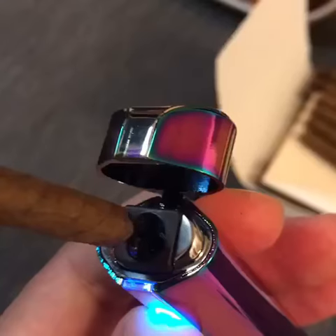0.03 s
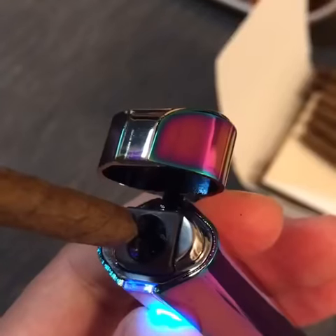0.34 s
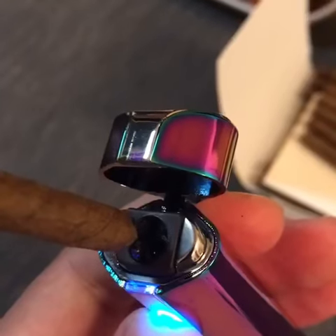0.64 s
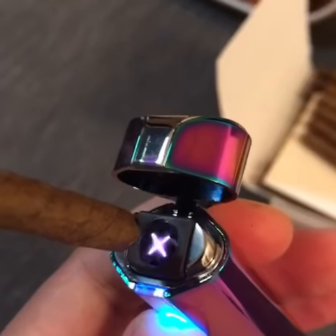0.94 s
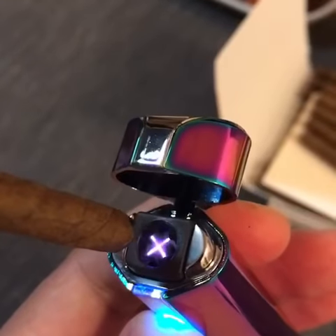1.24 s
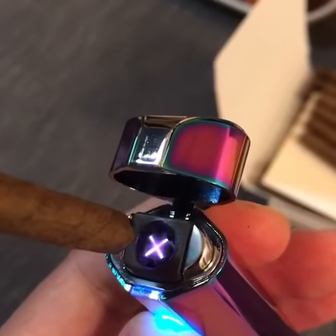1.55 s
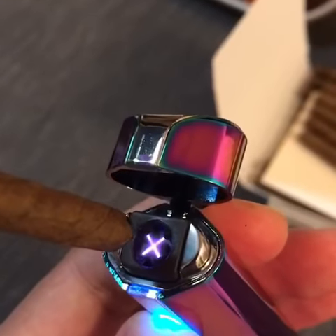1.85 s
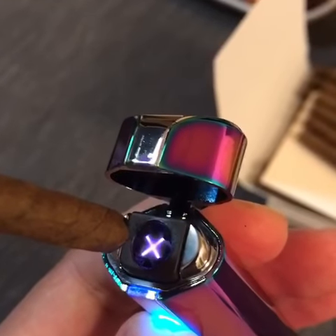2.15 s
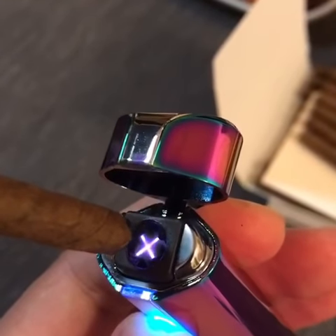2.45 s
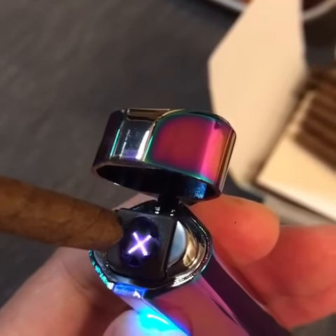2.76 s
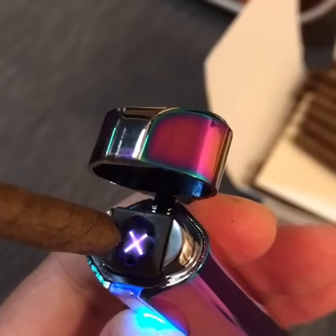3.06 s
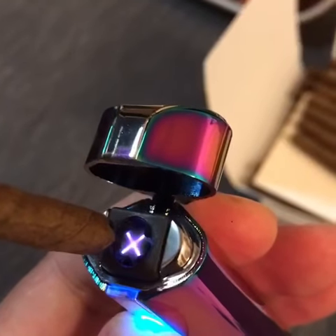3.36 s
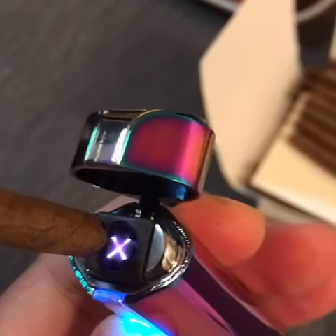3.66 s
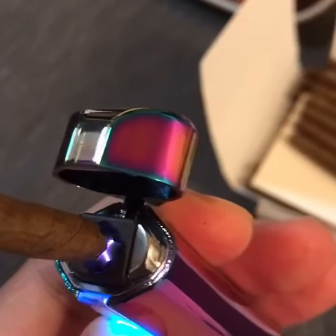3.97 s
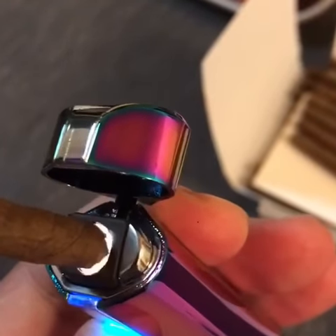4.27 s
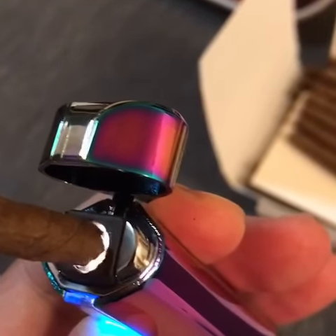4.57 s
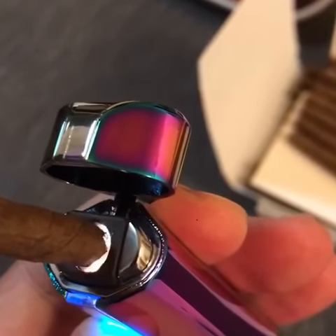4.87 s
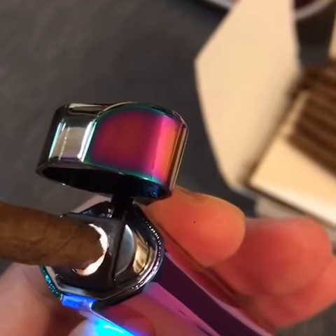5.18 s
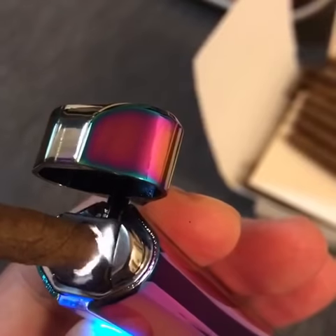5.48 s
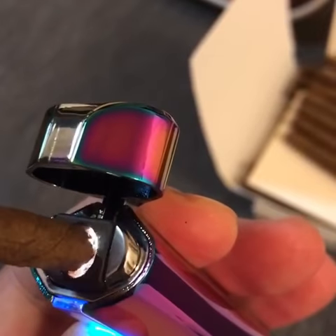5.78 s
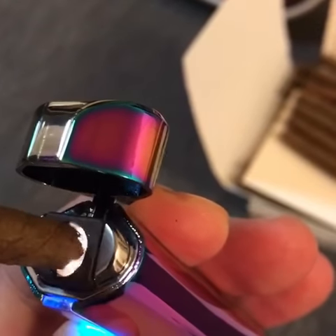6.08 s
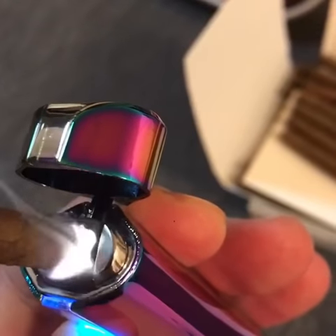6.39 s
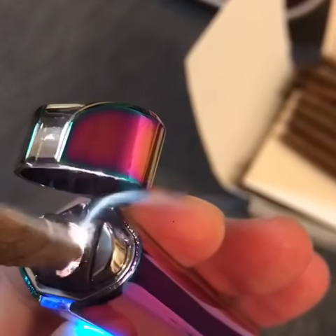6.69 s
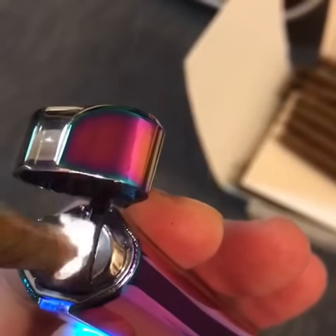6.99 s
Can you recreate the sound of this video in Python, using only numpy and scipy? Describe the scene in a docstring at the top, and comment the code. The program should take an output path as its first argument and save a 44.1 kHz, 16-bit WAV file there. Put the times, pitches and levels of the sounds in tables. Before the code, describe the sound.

In a quiet room, a lighter's button ticks faintly and a spark jumps with one sharp snap. The electric arc holds a thin, high, flickering hiss with a soft flutter of air. A cigar tip is pushed in, and the hiss turns into an uneven sizzle with bright spits and crackles. A dull knock on the case comes at the end. Everything is heard close up.

```python
"""An electric arc lighter burns close by in a quiet room. Its button ticks, a spark jumps the gap with
one sharp snap, and the arc hisses with countless tiny sparks. A cigar tip is pushed in: the arc chokes,
then sizzles and spits on the leaf. The metal well (the hollow round the electrodes) rings with the
sparks and colours their sound. At the end a finger knocks the case."""
import sys
import numpy as np
from scipy import signal
from scipy.fft import rfft, irfft, next_fast_len
from scipy.io import wavfile
from scipy.ndimage import uniform_filter1d, map_coordinates

SR = 44100
rng = np.random.default_rng(int(sys.argv[2]) if len(sys.argv) > 2 else 0)


def output_pcm(signal):
    """Save a mono or channel-first signal as 16-bit PCM at the path in sys.argv[1].

    Samples are clipped to [-1, 1] before scaling.
    """
    pcm = np.clip(np.atleast_2d(signal).T, -1, 1) * 32767
    wavfile.write(sys.argv[1], SR, np.round(pcm).astype(np.int16))


N = 314874
STRIKE_S, TOUCH_S = .9984, 4.27  # the arc lights; the cigar touches it

# The pitches at which the metal well and lid ring. Each row: pitch in Hz, width in Hz, boost in dB.
WELL_RESONANCES = [(2765, 130, 5.5), (3687, 570, 9), (4507, 204, 7), (5620, 840, 6.5), (6820, 620, 4),
                   (8560, 500, 1), (10000, 210, 2), (11040, 520, 1), (12400, 900, 6)]
# The tone of sparks on the leaf. Each row: frequency in Hz, relative level in dB.
SIZZLE_SPECTRUM = [(200, -21), (900, -24.5), (2000, -14.5), (3100, -16), (5000, -11), (6200, -16),
                   (7700, -6.5), (9400, 1.5), (11000, 5), (11700, 0.5), (13000, 1), (13400, -5),
                   (14000, -8.5)]
# The leaf spits bursts of sparks. Each row: start in seconds, relative level in dB, length in seconds.
SPIT_BURSTS = [(4.255, -35, 0.029), (4.343, -39, .003), (4.386, -36, .007), (4.4425, -26.5, 0.016),
               (4.466, -29, 0.0016), (4.5, -29, 0.006), (4.5453, -28, .004), (4.566, -27, .012),
               (4.635, -27.5, 0.012), (4.7, -31, 0.0062), (4.7275, -23.5, 0.004), (4.7593, -30, .004),
               (4.778, -26, 0.021), (4.843, -22.5, 0.0081), (4.861, -24, 0.0065), (4.899, -22.5, 0.0056),
               (4.9342, -23.5, 0.0041), (4.949, -23.5, 0.007), (4.966, -24, 0.015), (4.984, -21.5, .009),
               (5.0035, -22.5, 0.0018), (5.008, -26, 0.0039), (5.039, -20, .007), (5.0516, -18.5, 0.0056),
               (5.068, -22.5, .021), (5.088, -24, .003), (5.105, -28, .002), (5.1344, -19, 0.0039),
               (5.161, -28, .012), (5.205, -19.5, 0.0045), (5.226, -25, .009), (5.244, -25.5, 0.016),
               (5.505, -27, .006), (5.652, -26, 0.005), (5.686, -26, 0.0042), (5.705, -22.5, 0.006),
               (5.752, -24, .003), (5.772, -24, .006), (6.073, -26, 0.0054), (6.0928, -24, .007),
               (6.1172, -22, 0.013), (6.378, -31, .007), (6.458, -28, 0.01), (6.5188, -32, .003),
               (6.5412, -25.5, 0.0079), (6.59, -22.5, 0.009), (6.609, -24, 0.0089), (6.636, -23, 0.0043),
               (6.689, -30, 0.009), (6.7193, -25.5, 0.0088), (6.908, -31, .005), (6.952, -28, .007)]


def amp(db):
    """Turn decibels into a number to multiply by."""
    return 10 ** (np.asarray(db) / 20)


def unit(x):
    """Scale x to an average (rms) level of 1."""
    return x / np.sqrt(np.mean(x ** 2) + 1e-20)


def clock():
    """The time of each sample in seconds."""
    return np.arange(N) / SR


def curve(rows):
    """Join (seconds, value) points with straight lines."""
    return np.interp(clock(), *np.transpose(rows))


def after(s, rise):
    """Climb from 0 to 1 over rise seconds, starting at time s."""
    return np.clip((clock() - s) / rise, 0, 1)


def hump(s, length):
    """A smooth rise to 1 and fall, centred on time s."""
    return np.cos(np.pi * np.clip((clock() - s) / length, -.5, .5)) ** 2


def wobble(rate):
    """A smooth curve through rate random points a second."""
    return map_coordinates(rng.standard_normal(int(N * rate / SR) + 4), [clock() * rate])


def filtered(x, response):
    """Multiply each frequency in x by response(hz)."""
    size = next_fast_len(N + SR // 2)
    return irfft(rfft(x, size) * response(np.fft.rfftfreq(size, 1 / SR)), size)[:N]


def coloured(x, spectrum, resonances=(), size=8192):
    """Give x a tone: a smooth spectrum with ringing peaks on top, in a filter of energy 1."""
    hz = np.fft.rfftfreq(size, 1 / SR)
    points_hz, points_db = np.transpose(spectrum)
    db = np.interp(np.log(hz + 1), np.log(points_hz), points_db)
    db = db + sum(boost / (1 + (2 * (hz - centre) / width) ** 2) for centre, width, boost in resonances)
    # build the filter so that it rings only after each hit, never before
    cepstrum = irfft(np.log(amp(db)))
    ring = irfft(np.exp(rfft(2 * cepstrum[:size // 2], size)))
    return signal.fftconvolve(x, ring / np.linalg.norm(ring))[:N]


def swell(x, treble_db, body_db, split_hz):
    """The treble of a sound and the body below it each follow their own level."""
    body = filtered(x, lambda hz: 1 / (1 + (hz / split_hz) ** 8))
    return amp(body_db) * unit(body) + amp(treble_db) * unit(x - body)


def patchy(x, depth_db):
    """The tone of a sound shifts at random from moment to moment."""
    spectra = signal.stft(x, nperseg=512)[2]
    patches = uniform_filter1d(rng.standard_normal(spectra.shape), size=4, axis=0)  # smooth over pitch
    patches = uniform_filter1d(patches, size=12, axis=1)  # and over time
    return signal.istft(spectra * amp(depth_db * unit(patches)), nperseg=512)[1][:N]


def echoed(x, delay_ms, drift_ms, share):
    """Sound bounces off something near; as the hand drifts, the delay changes and the tone shifts."""
    delay = (delay_ms + drift_ms * wobble(2.5)) * SR / 1000
    return x + share * map_coordinates(x, [np.arange(N) - delay])


def clicks(rows):
    """A one-sample click for each (seconds, dB)."""
    x = np.zeros(N)
    for s, db in rows:
        x[round(s * SR)] = amp(db)
    return x


def rattled(hits, rattle_db, t60):
    """The metal shell rattles after each hit, fading by 60 dB in t60 seconds."""
    t = np.arange(SR // 20) / SR
    tail = rng.standard_normal(len(t)) * amp(-60 * t / t60)
    return hits + amp(rattle_db) * signal.fftconvolve(hits, tail / np.linalg.norm(tail))[:N]


def sparks(rate, spread_db):
    """Tiny sparks of random size at random moments, about rate a second."""
    fired = rng.random(N) < rate / SR
    size = amp(spread_db * np.clip(rng.standard_normal(N), -2, 2))
    return unit(fired * size * rng.choice([-1, 1], N))


def room():
    """Low air noise, with a few room resonances and a faint high whistle."""
    # The background noise dips after the snap, then slowly comes partway back.
    # Each row: time in seconds, level in dB.
    noise_levels = [(.9, -52), (1.1, -56.5), (3.0, -56.5), (4.6, -55), (7.1, -55)]
    # The deep tone of the room. Each row: frequency in Hz, relative level in dB.
    air_spectrum = [(20, -37), (35, -15), (55, 3), (80, -7), (112, -0.5), (145, -7), (185, 0.5), (275, 1),
                    (350, -8.5), (480, -14.5), (1000, -14), (2000, -22), (5000, -35.5), (14000, -47)]
    # Each row: pitch in Hz, width in Hz, boost in dB.
    resonances = [(59, 4.5, 1.0), (107, 13, 3.1), (220, 20, 1.3), (1250, 210, 1.2), (8540, 550, 14.5)]
    air = coloured(rng.standard_normal(N), air_spectrum, resonances)
    return amp(curve(noise_levels)) * unit(air)


def handling():
    """The button ticks under the thumb; later a finger knocks the case."""
    # Hits on the button and on the case. Each row: start in seconds, level in dB.
    button_hits = [(.9587, -36), (.9752, -43)]
    case_hits = [(7.087, -25), (7.0942, -23.5)]
    # The bright button and the dull case. Each row: frequency in Hz, relative level in dB.
    button_spectrum = [(1000, -13), (4000, 0), (5500, -2), (8500, 0), (14000, -12)]
    case_spectrum = [(60, -1), (200, -2), (500, -8), (1400, -10), (2500, -28), (8000, -47)]
    ticks = coloured(rattled(clicks(button_hits), rattle_db=5.5, t60=0.016), button_spectrum)
    return ticks + coloured(clicks(case_hits), case_spectrum)


def flutter():
    """The hot arc wavers and puffs the air: a soft rustle that swells with each sway."""
    # The arc sways. Each row: time of the peak in seconds, boost in dB.
    sways = [(1.79, 6), (2.08, 10), (2.38, 9), (3.05, 10.5), (4.55, 3.5)]
    # The mellow tone of the puffs. Each row: frequency in Hz, relative level in dB.
    puff_spectrum = [(100, -21.5), (300, 2), (500, -0.5), (1000, 1), (1600, -4), (2200, -7), (3200, -7),
                     (6000, -45)]
    level_db = -68 + 4.5 * after(2.76, rise=0.52)  # louder as the cigar comes near
    level_db = level_db + sum(db * hump(s, length=0.28) for s, db in sways)
    puffs = coloured(sparks(rate=5000, spread_db=5.5), puff_spectrum)
    gain = after(STRIKE_S, rise=.008) * amp(level_db + wobble(7))
    return gain * unit(echoed(puffs, delay_ms=3.093, drift_ms=0.27, share=0.39))


def spits():
    """Pockets of moisture burst: each starts at once, sputters brightly for a moment and breaks off."""
    bursts = np.zeros(N + SR)
    t = np.arange(SR // 8) / SR
    for s, db, length in SPIT_BURSTS:
        bursts[round(s * SR):][:len(t)] += amp(db) * np.exp(-(t / length) ** 4)
    sputter = unit(sparks(rate=14000, spread_db=0.5) * amp(2.0 * wobble(1200)))
    resonances = WELL_RESONANCES + [(13960, 810, 15.6), (4600, 1800, 1.5)]
    return amp(-13.5) * coloured(bursts[:N] * sputter, SIZZLE_SPECTRUM, resonances)


def stalls(depth_db, half_length_s):
    """The sizzle falters for an instant before each spit."""
    lull = np.zeros(N)
    dip = np.bartlett(2 * round(half_length_s * SR))
    for s, _, _ in SPIT_BURSTS:
        lull[round(s * SR) - len(dip):round(s * SR)] += dip
    return amp(-depth_db * lull)


def crackles(rate, spread_db, fade_s):
    """Hard little cracks, each a tight knot of sparks that dies away fast."""
    t = np.arange(SR // 200) / SR
    knots = signal.fftconvolve(np.abs(sparks(rate, spread_db)), np.exp(-t / fade_s))[:N]
    return unit(knots * rng.standard_normal(N))


def sizzle():
    """On the leaf the sparks come in clumps; they flare as it catches and choke as it presses in."""
    # The steady frying. Each row: time in seconds, relative level in dB.
    burn_levels = [(4.4, -49), (4.45, -50), (4.57, -46.5), (4.75, -47), (5.11, -40.5), (5.27, -50),
                   (5.5, -46), (5.91, -47), (6.57, -46), (6.7, -48), (6.85, -48.5), (7.0, -48),
                   (7.13, -48.5)]
    # The leaf smothers the arc. Each row: middle in seconds, change in dB, length in seconds.
    chokes = [(4.323, -10.5, 0.19), (4.368, -6, .035), (4.677, -3, 0.015), (4.754, -7, 0.023),
              (4.922, -6, 0.048), (4.997, -3, .014), (5.03, -5, 0.019), (5.116, -5, 0.058),
              (5.598, -4, 0.13), (6.153, -10.5, 0.094), (6.33, -3.5, 0.11), (6.52, -3, .04),
              (6.606, -9, 0.014), (6.708, -1, .03), (6.801, -5.5, 0.085), (6.898, -4.5, .03),
              (7.098, -6, 0.052)]
    # A patch of leaf catches.
    # Each row: middle in seconds, treble boost in dB, body boost in dB, length in seconds.
    flares = [(4.268, 5.5, 8, 0.065), (4.45, 4.5, 6, 0.046), (4.575, 7, 5, 0.061), (5.067, 2, 2.5, 0.068),
              (5.248, 8, 6.5, 0.18), (5.742, 2, 5, 0.2), (6.06, 2, 4, 0.33), (6.215, 1, 2, .12),
              (6.552, 2.5, 4, .04), (6.59, 8.5, 12.5, 0.13), (6.95, 3, 3, 0.032)]
    burn_db = curve(burn_levels) + sum(db * hump(s, length) for s, db, length in chokes)
    treble_db = burn_db + sum(db * hump(s, length) for s, db, _, length in flares) + 1.4
    body_db = burn_db + sum(db * hump(s, length) for s, _, db, length in flares) - 9.5
    clumps = amp(1.1 * wobble(70) + 1.8 * wobble(600))
    frying = unit(sparks(rate=16000, spread_db=2.4) * clumps)
    # crackles stand out on the fresh leaf and sink into the frying as it chars
    crackle_gain = amp(-0.5 - 4.5 * after(TOUCH_S + 0.5, rise=1))
    frying = frying + crackle_gain * crackles(rate=240, spread_db=2.5, fade_s=0.00045)
    frying = frying / np.hypot(1, crackle_gain)  # keep the total level even
    frying = frying * stalls(depth_db=2.5, half_length_s=0.015)
    frying = coloured(frying, SIZZLE_SPECTRUM, WELL_RESONANCES)
    frying = echoed(frying, delay_ms=1.3, drift_ms=0.11, share=0.062)
    frying = patchy(frying, depth_db=2.3)
    return after(TOUCH_S - .02, rise=0.006) * swell(frying, treble_db, body_db, split_hz=7160)


def strike():
    """The first spark jumps: a bright crack, a dull pop of heated air and a low thump from the room."""
    # The tones of the crack, the pop and the thump. Each row: frequency in Hz, relative level in dB.
    crack_spectrum = [(500, -37), (3000, -18), (4900, -14), (6300, 2), (7700, -0.5), (8600, 4), (11000, 5),
                      (12800, 3), (13600, 5), (14600, -5)]
    pop_spectrum = [(30, -18), (70, 1.5), (170, 0.5), (400, 4), (580, 5.5), (1000, 2.5), (1500, -2),
                    (2700, -7.5), (3500, -16), (5000, -27), (12000, -47)]
    thump_spectrum = [(30, -15), (60, 1), (220, -5), (500, -16), (2000, -50)]
    crack = rattled(clicks([(STRIKE_S, -2.5)]), rattle_db=-12, t60=.012)
    crack = coloured(crack, crack_spectrum, resonances=[(11600, 200, 4.6)])
    pop = coloured(clicks([(STRIKE_S, 1.1)]), pop_spectrum, resonances=[(172, 76, 1.1)])
    lag_hz = 480  # the lows below this arrive last, so the pop falls in pitch
    pop = filtered(pop, lambda hz: ((lag_hz - 1j * hz) / (lag_hz + 1j * hz)) ** 3)
    thump = coloured(clicks([(STRIKE_S + 0.00584, -19)]), thump_spectrum)
    return crack + rattled(pop + thump, rattle_db=-20, t60=0.058)


def wandering(x, share, rate):
    """The ringing wavers in pitch by a small share as the hot arc moves in the well."""
    return map_coordinates(x, [np.cumsum(1 + share * wobble(rate))], order=5, mode="mirror")


def free_arc():
    """The arc in open air: sparks so dense that they merge into a hiss, with stray larger ones."""
    # The wandering arc flares or sags. Each row: middle in seconds, change in dB.
    surges = [(1.67, 0), (2.13, -2.5), (2.19, 1), (2.3, -1.5), (2.54, 0.7), (2.64, 4), (2.8, 1), (3.19, -3),
              (3.29, 1), (3.73, -2), (3.81, 2), (3.985, 4)]
    # The high tone of the hiss. Each row: frequency in Hz, relative level in dB.
    hiss_spectrum = [(200, -24), (700, -21), (1500, -15), (2200, -13), (3200, -14), (5000, -9.5),
                     (6150, -19), (7600, -7.5), (8500, 1), (9400, -1.5), (10400, 3), (11600, 3.5),
                     (12300, -20), (12700, -58)]
    cold_db = -4 * (1 - after(1.17, rise=0.58))  # the arc starts weak and warms up
    waning_db = -1.42 * np.maximum(clock() - 2.26, 0)  # then slowly fades
    level_db = -49.6 + cold_db + waning_db + sum(db * hump(s, length=0.095) for s, db in surges)
    flicker = amp(0.091 * wobble(16) + 0.95 * wobble(60) + 0.77 * wobble(500))
    dense = sparks(rate=22000, spread_db=2) * flicker
    strays = amp(-14) * sparks(rate=240, spread_db=1)
    hiss = coloured(dense + strays, hiss_spectrum, WELL_RESONANCES)
    hiss = wandering(hiss, share=.011, rate=7)
    hiss = echoed(hiss, delay_ms=1.3, drift_ms=0.14, share=0.051)
    hiss = patchy(hiss, depth_db=1.55)
    burning_free = after(STRIKE_S, rise=0.0057) * (1 - after(TOUCH_S, rise=0.017))
    return burning_free * swell(hiss, treble_db=level_db, body_db=level_db - 5.9, split_hz=5900)


def scene():
    """All the sounds added up, the same on both channels."""
    mono = handling() + strike() + free_arc() + flutter() + sizzle() + spits() + room()
    return np.array([mono, mono])


def record(dry):
    """The sound comes in after a moment of silence, with the very highest treble cut off."""
    fade_in = after(0.083, rise=.006)
    top_hz = 14050
    return np.array([filtered(x * fade_in, lambda hz: 1 / (1 + (hz / top_hz) ** 200)) for x in dry])


dry = scene()
out = record(dry)
output_pcm(out)
```